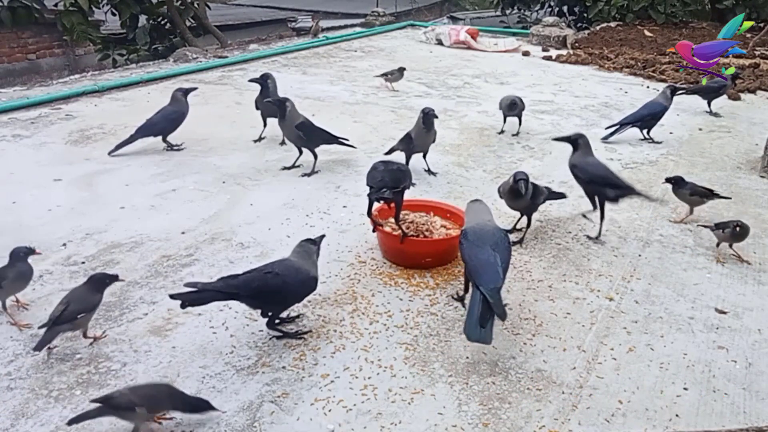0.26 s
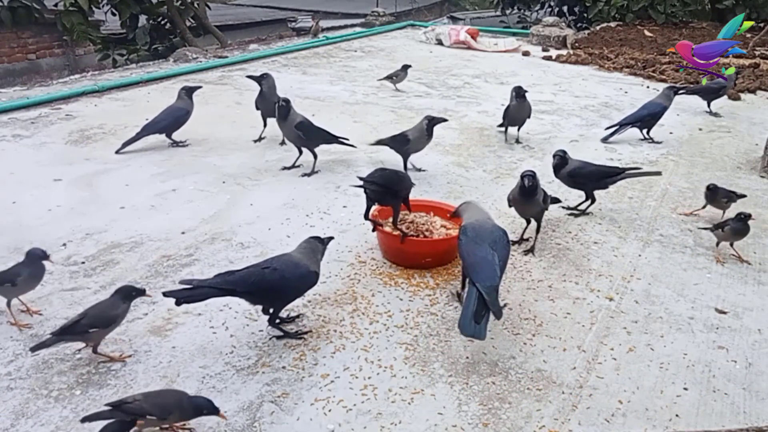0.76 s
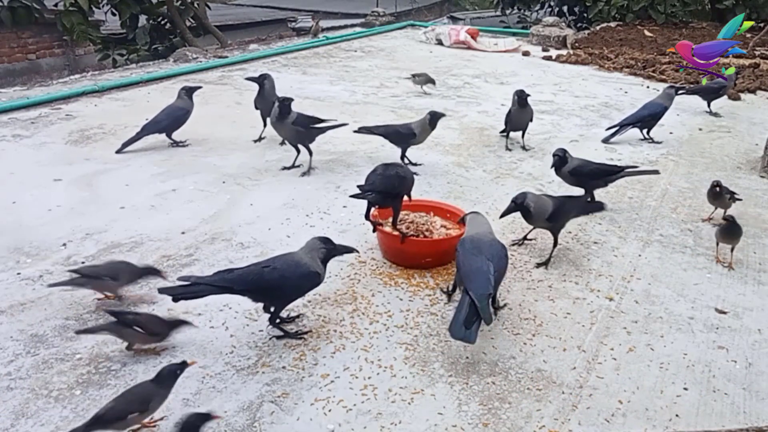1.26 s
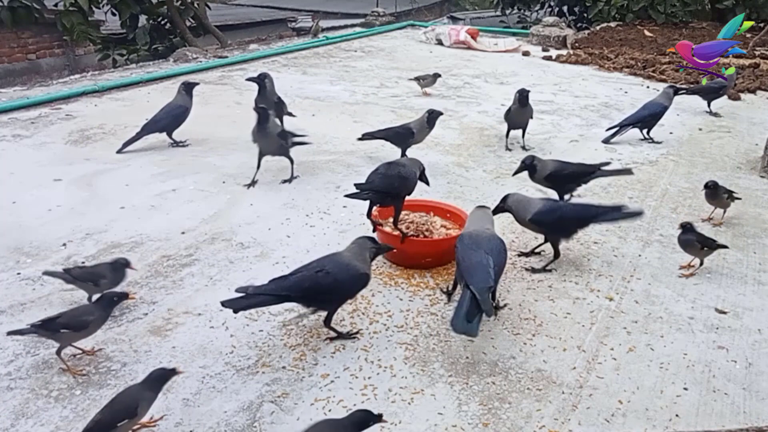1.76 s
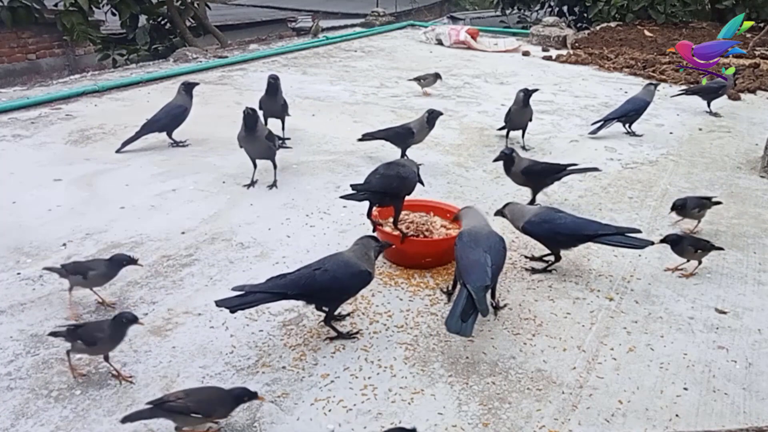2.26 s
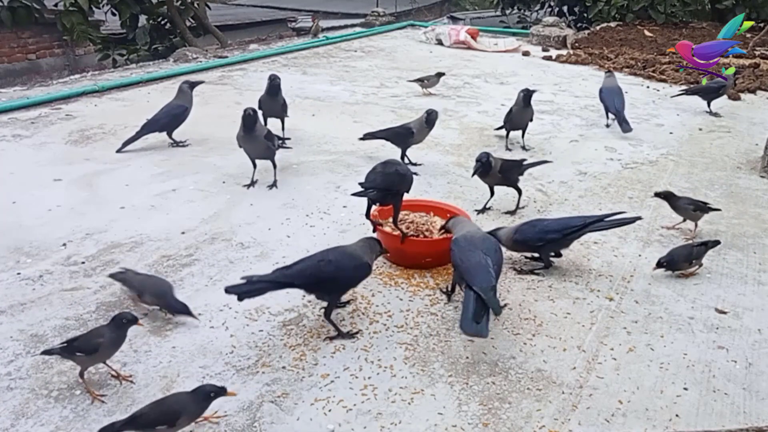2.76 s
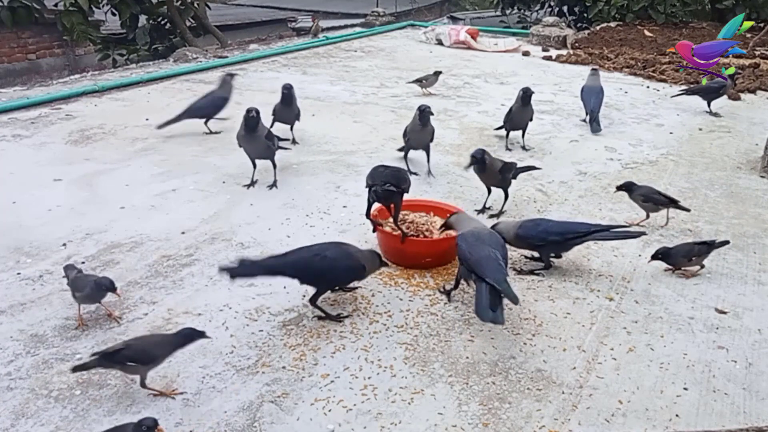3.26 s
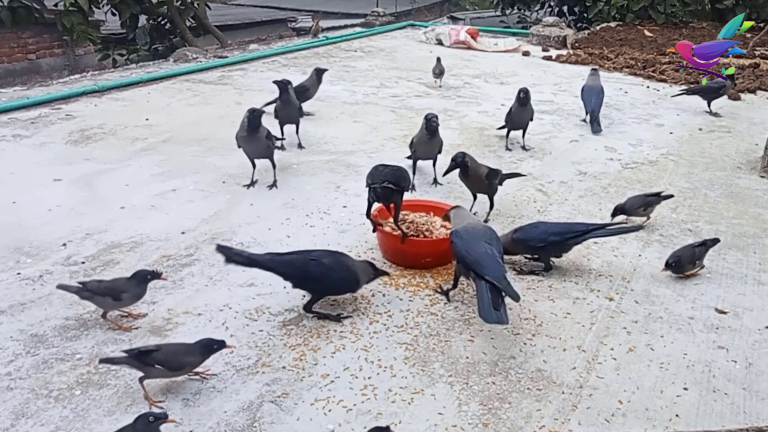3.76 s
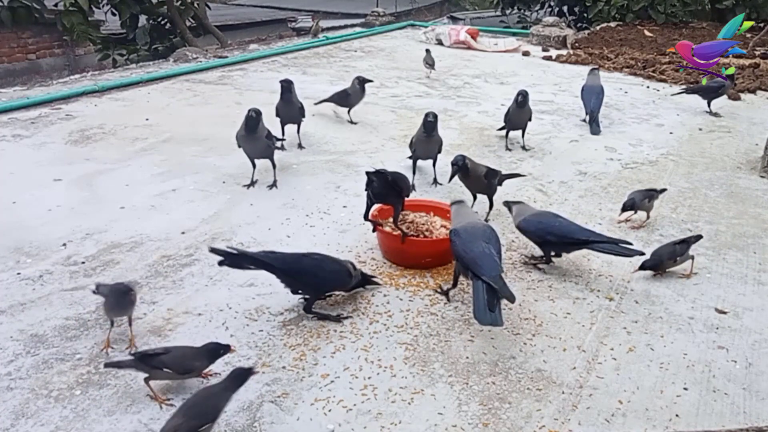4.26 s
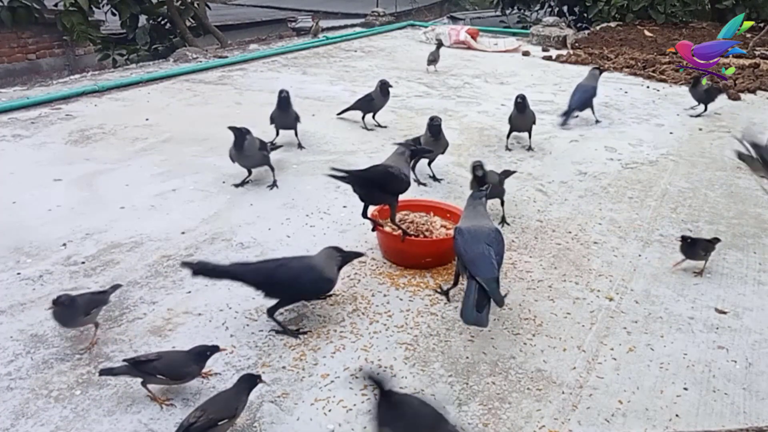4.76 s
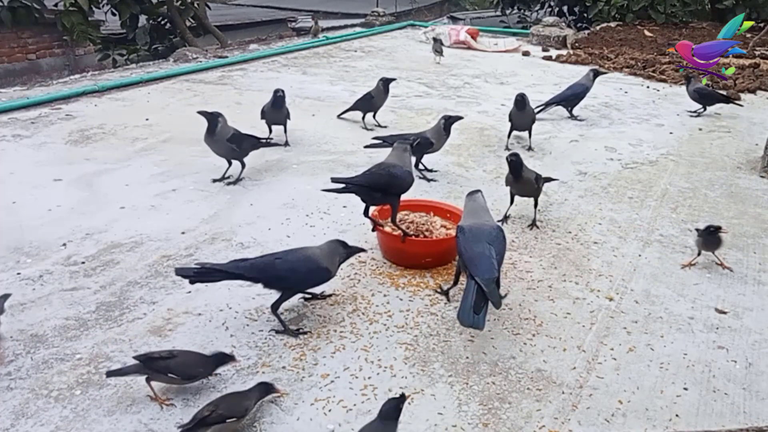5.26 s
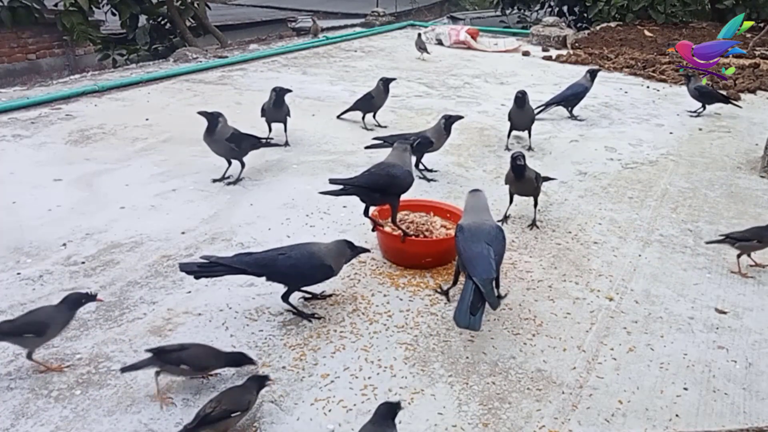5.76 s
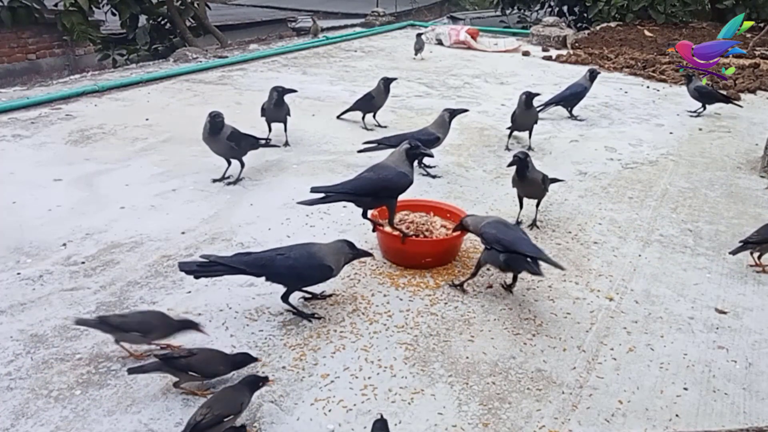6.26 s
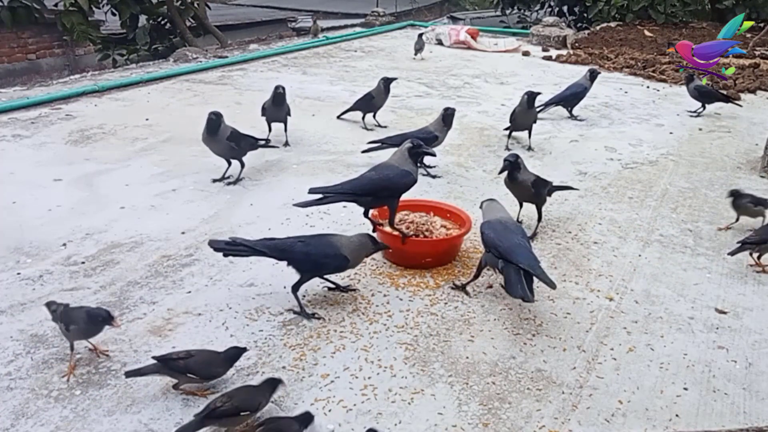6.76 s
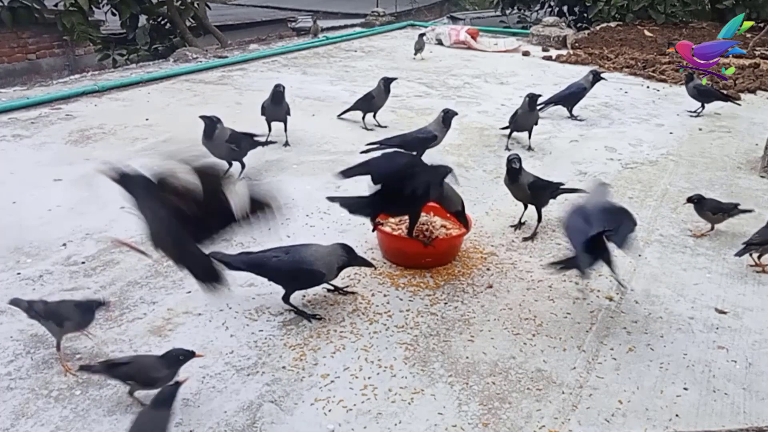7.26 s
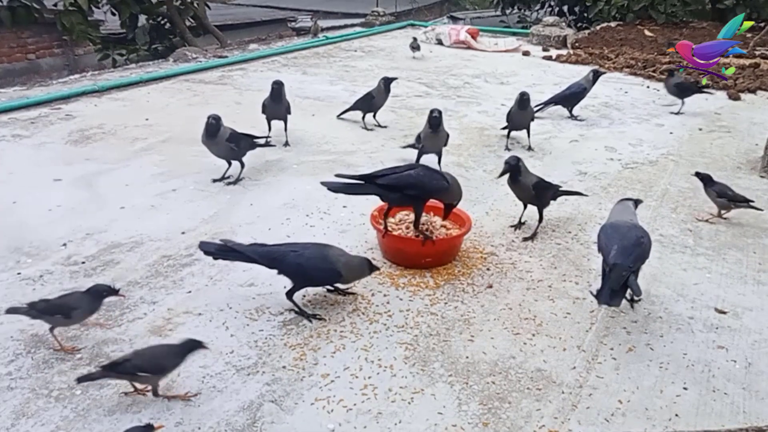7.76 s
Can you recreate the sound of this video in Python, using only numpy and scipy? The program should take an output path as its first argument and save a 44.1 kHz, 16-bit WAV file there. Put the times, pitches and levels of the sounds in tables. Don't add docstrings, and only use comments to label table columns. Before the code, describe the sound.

Crows and mynas peck scattered grain on an open rooftop, dry ticks and tub knocks under distant caws, then two loud harsh caws close by.

```python
import sys
import numpy as np
from scipy import signal
from scipy.fft import rfft, irfft
from scipy.io import wavfile
from scipy.ndimage import uniform_filter1d

SR = 44100
rng = np.random.default_rng(int(sys.argv[2]) if len(sys.argv) > 2 else 0)


def pcm_store(signal):
    levels = np.round(np.clip(np.atleast_2d(signal), -1, 1) * 32767)
    wavfile.write(sys.argv[1], SR, levels.astype(np.int16).T)


def magnitude_from_level(level_db):
    exponent = np.asarray(level_db, float) / 20
    return 10 ** exponent


N = 352800

# (frequency [Hz], level [dB])
AIR_SPECTRUM = [(25, -48), (50, -48), (100, 0), (200, 3), (500, -6), (1000, -10.5), (2000, -13.5),
                (4000, -27), (5000, -44.5), (8000, -33.5), (15000, -53)]
# (time [s], level [dB])
BREEZE = [(0.0, -53.5), (1.5, -52.5), (2.3, -47.5), (3.34, -56), (3.7, -52), (4.3, -53), (4.81, -48.5),
          (5.5, -52), (7.0, -53), (7.17, -45), (7.35, -51.5), (8.0, -50.5)]
# (time [s], level [dB])
SCUFFLE = [(0.0, -79.5), (0.55, -65), (1.2, -76.5), (2.49, -65), (3.08, -65.5), (3.32, -86), (3.65, -64.5),
           (3.83, -69), (3.98, -87), (4.7, -56.5), (5.05, -65), (5.37, -59), (5.7, -75.5), (6.08, -58.5),
           (6.35, -75), (6.75, -68), (7.74, -69), (8.0, -76)]
AIR_DB, AIR_PER_BREEZE, CALM_BREEZE_DB = -54, 0.69, -52.5

# (time [s], length [s], start pitch [Hz], end pitch [Hz], level [dB])
CHIRPS = [(0.081, 0.032, 3200, 3550, -60.5), (0.098, 0.057, 4070, 3520, -66),
          (0.842, 0.026, 2500, 2700, -57.5), (0.768, 0.05, 2840, 2460, -57.5),
          (0.881, 0.042, 3000, 2793, -45), (0.912, 0.018, 3190, 3000, -53), (2.814, 0.035, 3740, 4140, -60),
          (2.852, 0.052, 2700, 2700, -60), (2.932, 0.044, 4280, 4300, -59), (2.973, 0.054, 3445, 3370, -48),
          (2.982, 0.042, 2870, 2700, -54), (4.241, 0.065, 2730, 2770, -63), (2.771, 0.072, 2420, 2450, -51),
          (2.815, 0.034, 2650, 2635, -50.5), (2.89, 0.0725, 3125, 2750, -46.5)]
# (time [s], length [s], start pitch [Hz], end pitch [Hz], level [dB])
CHURRS = [
    (0.857, 0.047, 3250, 3040, -50.5),
    (0.895, 0.037, 2890, 2795, -60.5),
]
CHIRP_OCTAVE_DB, CHURR_OCTAVE_DB = -15, 5

# (time [s], peak level [dB], ring near 3 kHz [dB])
PECKS = [(0.874, -42, -7), (1.1268, -40.5, -9), (1.1516, -31.5, -8), (1.1704, -37.5, -4), (1.5178, -37, -8),
         (1.7136, -43, -8), (1.8853, -30, 6.5), (1.8861, -24.5, 1.5), (1.997, -40, -8), (2.1216, -44.5, -9),
         (2.958, -36, -7), (3.0327, -25.5, -2.5), (3.0724, -42, -14), (3.3373, -37.5, -8.5),
         (3.6561, -42, -2), (3.9637, -40, -7), (3.9904, -38, -7), (4.2602, -45, -21), (4.373, -32.5, -4.5),
         (4.537, -29.5, -14), (4.622, -39, -11), (4.6513, -42, 5.5), (4.802, -31, -10), (5.232, -45, 0),
         (5.2821, -33, 7.5), (5.3303, -34, -4), (5.9977, -24, -5.5), (6.4833, -40.5, 3), (6.79, -39, -9),
         (6.8926, -37.5, -9)]
# (time [s], peak level [dB])
CLAWS = [(0.178, -47), (0.37, -39), (0.4603, -30), (0.5575, -32.5), (1.2993, -44), (1.534, -40),
         (1.5943, -33.5), (1.7883, -43.5), (2.783, -32.5), (2.981, -30), (3.093, -44), (3.469, -37.5),
         (4.6937, -35), (4.89, -38), (4.9684, -31), (5.0996, -40), (5.839, -49), (6.1479, -40),
         (6.1754, -40), (6.214, -32), (6.2734, -36), (6.4283, -45), (6.5118, -34), (6.581, -40),
         (6.629, -36), (6.9107, -36), (7.0334, -38), (7.0977, -14), (7.3475, -21), (7.919, -47.5)]
CLAW_RING_DB, STRAY_DB = -21, -44.5
# (time [s], peak level [dB])
KNOCKS = [
    (1.885, -23),
    (4.779, -32.5),
    (5.282, -24.5),
    (5.837, -44),
    (6.354, -38.5),
    (7.988, -30.5),
]
# (frequency [Hz], level [dB], decay t60 [s])
TUB_MODES = [(450, -14.5, 0.26), (862, -2.5, 0.047), (1507, 13, 0.0055), (1720, 9, 0.021)]

# (time [s], level [dB], length [s], brightness [Hz])
WING_STROKES = [(4.58, -42.5, 0.057, 3520), (4.647, -36.5, 0.031, 2510), (4.71, -46, 0.057, 2420),
                (4.786, -36, 0.025, 1970), (4.855, -46.5, 0.081, 2020), (4.937, -39.5, 0.038, 2020),
                (5.005, -44, 0.051, 2480), (5.082, -44, 0.054, 1980), (6.859, -47, 0.032, 3470),
                (6.906, -49, 0.033, 3480), (7.2, -47, 0.051, 300), (0.383, -50.5, 0.039, 3980),
                (0.577, -55.5, 0.041, 4000), (2.001, -50.5, 0.046, 4000)]

# (resonance [Hz], width [Hz])
THROAT = [(530, 200), (1060, 330), (1590, 300), (2120, 330), (2620, 330), (3280, 380), (4400, 600),
          (7250, 1900), (9800, 1500), (13000, 4000)]
CALM_HZ = 410

# (time [s], length [s], effort [dB], top pitch [Hz], droop [0-1])
CLEAR_CAWS = [
    (1.38, 0.39, -46.5, 528.8, .24),
    (2.12, 0.28, -42, 530.7, 0.25),
    (5.27, 0.31, -41.5, 519, .22),
]
DEEP_CAWS = [
    (5.84, .36, -43.5, 542, .17),
]
HOARSE_CAWS = [
    (2.17, .6, -44.5, 515.7, 0.1),
    (3.35, .5, -46.5, 502.5, .12),
    (3.94, .3, -54.5, 532, .14),
]
THIN_CAWS = [
    (4.3, .26, -55.5, 495, 0.058),
    (5.0, .29, -45.5, 575, 0.0616),
]
CLEAR_VOICE = 79, .045, .15, .07, -11.5, [-9, 0, 5, 1.5, -11, -19, -22]
DEEP_VOICE = 78, .07, .2, .06, -12, [-8, 7, 3.5, -3, -11, -22, -15]
HOARSE_VOICE = 75, 0.058, 2.414, 0.25, -10.5, [-27, -6, 3, 10.5, -7, -12.5, -13.5]
THIN_VOICE = 70, 0.069, 1.31, 0.093, 1.5, [-30, -3, 11, -11, -22, -11, -26]
FAR_START_DB = -9
# (time [s], length [s], level [dB], pitch [Hz])
CROAKS = [
    (4.67, 0.079, -41.5, 510),
    (4.82, 0.056, -41, 520),
    (4.932, 0.13, -43.5, 507),
    (5.047, 0.067, -45.5, 605),
    (5.13, 0.094, -41.5, 524),
    (5.27, 0.44, -52.5, 545),
    (6.151, 0.86, -54, 560),
]

# (time [s], pitch [Hz], effort [dB])
NEAR_CAW_A = [
    (7.047, 337, -30.5),
    (7.06, 398, -28.5),
    (7.075, 480, -20),
    (7.1, 538, -16),
    (7.135, 544.3, -16),
    (7.26, 490.7, -18.5),
    (7.33, 429.2, -21.5),
    (7.355, 299.6, -31),
    (7.38, 194, -46),
]
# (time [s], pitch [Hz], effort [dB])
NEAR_CAW_B = [
    (7.32, 450, -36),
    (7.345, 486.8, -20.5),
    (7.41, 548.7, -21),
    (7.46, 539.6, -20),
    (7.52, 503, -20),
    (7.6, 470.5, -21),
    (7.625, 429.7, -25.5),
    (7.65, 272, -39.5),
    (7.67, 196, -41),
]
NEAR_VOICE_A = 76, 0.2, 0.22, 0.31, 1, [-22, -6.5, -18.5, 1.5, 2, -8, -17.5, -15.5, -14.5, -19]
NEAR_VOICE_B = 84, 0.35, 0.22, 0.35, 1.11, [-27.5, -9, -11.5, 3.5, -15.5, -24, -31, -26.5, -29, -32]
NEAR_SWING_A, NEAR_SWING_B = 0.067, 0.091

# (frequency [Hz], gain [dB])
MIC = [(20, 0.5), (4200, 1.5), (5300, -1.5), (6300, 3.5), (7200, 7), (8600, -4.5), (14000, -9),
       (15500, 4.5), (15750, -27), (22050, -24)]


def evened(x):
    return x / np.sqrt(np.mean(x ** 2) + 1e-20)


def add(mix, start_s, sound):
    part = mix[round(start_s * SR):][:len(sound)]
    part += sound[:len(part)]


def along(rows, t):
    times, *columns = np.transpose(rows)
    return [np.interp(t, times, column) for column in columns]


def colour(x, points):
    n = x.shape[-1]
    hz = np.fft.rfftfreq(n, 1 / SR)
    point_hz, point_db = np.transpose(points)
    gain = magnitude_from_level(np.interp(np.log(hz + 1), np.log(point_hz), point_db))
    return irfft(rfft(x) * gain, n)


def resonate(x, hz, width_hz):
    turn = np.exp(2j * np.pi * np.cumsum(hz * np.ones(len(x))) / SR)
    r = np.exp(-np.pi * width_hz / SR)
    smooth = signal.lfilter([(1 - r) ** 2], [1, -2 * r, r * r], x / turn)
    return 2 * (turn * smooth).real


def drift(n, smooth):
    once = uniform_filter1d(rng.standard_normal(n), int(smooth))
    return evened(uniform_filter1d(once, int(smooth)))


def ground():
    t = np.arange(N) / SR
    breeze_db = along(BREEZE, t)[0]
    scuffle_db = along(SCUFFLE, t)[0]

    air_db = AIR_DB + AIR_PER_BREEZE * (breeze_db - CALM_BREEZE_DB) + 1.2 * drift(N, 5200)
    air = magnitude_from_level(air_db) * evened(colour(rng.standard_normal(N), AIR_SPECTRUM))

    gusts = rng.standard_normal(N) * magnitude_from_level(5.2 * drift(N, 1340))
    breeze = colour(gusts, [(20, -29), (45, -17), (75, 1.0), (140, -0.5), (260, -7.0), (600, -33.5)])

    grain_db = 2.5 * np.minimum(rng.exponential(1, N), 5) + 3.0 * drift(N, 400)
    hits = rng.choice([-1, 1], N) * (rng.random(N) < 4000 / SR)
    patter = colour(magnitude_from_level(grain_db) * hits,
                    [(700, 9), (2200, 5.0), (3600, 9.5), (4600, -6.5), (7000, -1.5), (15000, 1)])
    return air + magnitude_from_level(breeze_db - 5.5) * evened(breeze) + magnitude_from_level(scuffle_db + 7.0) * evened(patter)


def mynas():
    out = np.zeros(N)
    calls = [(*c, CHIRP_OCTAVE_DB) for c in CHIRPS] + [(*c, CHURR_OCTAVE_DB) for c in CHURRS]
    for start_s, length_s, start_hz, end_hz, db, octave_db in calls:
        u = np.linspace(0, 1, int(length_s * SR))
        glide_hz = start_hz + (end_hz - start_hz) * u
        phase = 2 * np.pi * np.cumsum(glide_hz * (1 + 0.03 * drift(len(u), 50))) / SR
        burr = magnitude_from_level(4 * drift(len(u), 90))
        tone = burr * np.sin(phase) + magnitude_from_level(octave_db) * np.sin(phase / 2)
        add(out, start_s, magnitude_from_level(db + 4.0) * np.sin(np.pi * u) * tone)
    return out


def beaks_and_claws():
    out = np.zeros(N)
    t = np.arange(1500) / SR
    stray = [(s * N / SR, STRAY_DB + 2.8 * u) for s, u in rng.random((24, 2))]
    for start_s, db, ring_db in PECKS + [(*c, CLAW_RING_DB) for c in CLAWS + stray]:
        decay = magnitude_from_level(-60 * t / 0.026) + 0.053 * magnitude_from_level(-60 * t / 0.033)
        crack = rng.standard_normal(1500) * decay * np.minimum(t / 0.00018, 1)
        ring = resonate(crack, rng.uniform(3000, 3700), 1900)
        snap = resonate(crack, rng.uniform(7000, 13500), 9000)
        tick = magnitude_from_level(-2.5) * snap / abs(snap).max() + magnitude_from_level(ring_db) * ring / abs(ring).max()
        add(out, start_s, magnitude_from_level(db) * tick)
    for start_s, db in KNOCKS:
        knock = np.zeros(len(t))
        for hz, mode_db, t60_s in TUB_MODES:
            struck_hz = hz * rng.uniform(0.85, 1.04)
            knock += magnitude_from_level(mode_db - 60 * t / t60_s) * np.sin(2 * np.pi * struck_hz * t)
        add(out, start_s, magnitude_from_level(db - 12.5) * knock)
    return out


def wings():
    out = np.zeros(N)
    for s, db, length_s, bright_hz in WING_STROKES:
        n = int(2 * length_s * SR)
        spectrum = [(35, -24), (75, 11), (180, 8), (600, -2), (bright_hz + 400, -8),
                    (5200, -24), (13000, -17), (16000, -19)]
        puff = colour(rng.standard_normal(n) * magnitude_from_level(2 * drift(n, 90)), spectrum)
        add(out, s - length_s, magnitude_from_level(db - 0.5) * evened(puff) * np.hanning(n) ** 1.2)
    return out


def caw(hz, effort_db, swing, flutter_hz, throb, rough, follow, pipe, throat_db):
    n = len(hz)
    flutter = 2 * np.pi * np.cumsum(flutter_hz * (1 + 0.023 * drift(n, 1200))) / SR
    wave = np.cos(flutter) + 0.3 * np.cos(2 * flutter + 1.2)
    turns = np.cumsum(hz * (1 + swing * wave + 0.05 * rough * drift(n, 40))) / SR
    pulses = np.zeros(n)
    for k in range(1, 25):
        weight = 1 + (k / 15) ** 3 + 3 * (k == 1)
        pulses += np.cos(2 * np.pi * k * turns + 0.45 * k * k) / weight
    breath = magnitude_from_level(1.5 * drift(n, 50)) * np.diff(rng.standard_normal(n + 2), 2)
    drive = evened(pulses) * (1 + throb * np.cos(flutter + 1.7))
    drive = drive + (0.35 + 0.35 * rough) * evened(breath)

    stretch = hz / 535
    windpipe = (stretch * pipe, 1)
    beak = (stretch ** follow, stretch ** 1.5)
    treble = (stretch ** 0.3, stretch ** 0.6 * np.clip(hz / CALM_HZ, 0, 1) ** 6)
    tuned = [windpipe] * 2 + [beak] * 4 + [treble] * 4
    voice = np.zeros(n)
    for k, db in enumerate(throat_db):
        tuning, gain = tuned[k]
        throat_hz, width_hz = THROAT[k]
        voice += (-1) ** k * magnitude_from_level(db) * gain * resonate(drive, throat_hz * tuning, width_hz)
    return magnitude_from_level(effort_db) * evened(voice)


def far_crows():
    out = np.zeros(N)
    birds = ((CLEAR_CAWS, CLEAR_VOICE), (DEEP_CAWS, DEEP_VOICE),
             (HOARSE_CAWS, HOARSE_VOICE), (THIN_CAWS, THIN_VOICE))
    for caws, (flutter_hz, swing, rough, rise_s, fade_db, throat_db) in birds:
        for start_s, length_s, db, top_hz, droop in caws:
            t = np.arange(0, length_s, 1 / SR)
            hz = top_hz * (1 - droop * (t / length_s) ** 2.5 - 0.08 * np.exp(-t / 0.03))
            effort_db = db + np.interp(t, [0, rise_s, length_s + rise_s], [FAR_START_DB, 0, fade_db])
            voice = caw(hz, effort_db, swing, flutter_hz, throb=0.6, rough=rough, follow=0.9,
                        pipe=1.11, throat_db=throat_db)
            add(out, start_s, voice * signal.windows.tukey(len(t), 0.2))
    for start_s, length_s, db, hz in CROAKS:
        n = int(length_s * SR)
        lumps = magnitude_from_level(4.5 * drift(n, 400)) * rng.standard_normal(n)
        croak = resonate(lumps, hz * (1 + 0.12 * drift(n, 1800)), 200)
        add(out, start_s, magnitude_from_level(db - 2.5) * evened(croak) * signal.windows.tukey(n, 0.7))
    return out


def near_crows():
    out = np.zeros(N)
    for rows, swing, voice in ((NEAR_CAW_A, NEAR_SWING_A, NEAR_VOICE_A),
                               (NEAR_CAW_B, NEAR_SWING_B, NEAR_VOICE_B)):
        t = np.arange(rows[0][0], rows[-1][0], 1 / SR)
        hz, effort_db = along(rows, t)
        dying_swing = swing * np.clip(hz / CALM_HZ, 0, 1) ** 4
        add(out, t[0], caw(hz, effort_db, dying_swing, *voice))
    return out


def rooftop(x, t60_s, dull):
    taps = np.zeros(SR)
    at = np.arange(300, SR - 20, 20) + rng.integers(0, 20, (SR - 301) // 20)
    taps[at] = rng.choice([-1.0, 1.0], len(at)) * magnitude_from_level(-60 * at / SR / t60_s)
    taps = signal.lfilter([1], [1, -dull], taps)
    return signal.fftconvolve(x, taps / np.linalg.norm(taps))[:N]


def scene():
    small = mynas() + beaks_and_claws() + wings()
    far = far_crows()
    near = near_crows()
    small_mix = small + magnitude_from_level(-10.5) * rooftop(small, 0.077, 0.048)
    far_mix = magnitude_from_level(-3.0) * far + magnitude_from_level(-5.5) * rooftop(far, 0.56, 0.38)
    near_mix = near + magnitude_from_level(-13) * rooftop(near, 0.12, 0.2) + magnitude_from_level(-18) * rooftop(near, 0.6, 0.3)
    return (ground() + small_mix + far_mix + near_mix)[None]


def band_limit(x):
    return signal.sosfilt(signal.butter(12, 16830, fs=SR, output="sos"), x)


def record(dry):
    mix = colour(dry, MIC)
    return band_limit(mix)


dry = scene()
out = record(dry)
pcm_store(out)
```